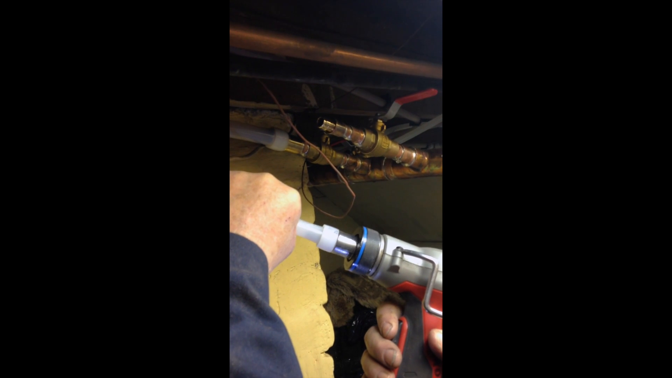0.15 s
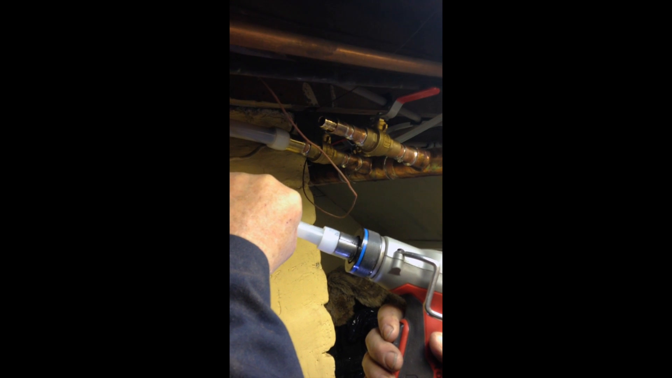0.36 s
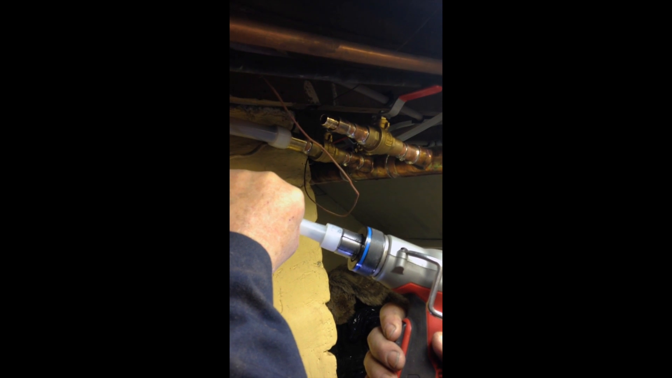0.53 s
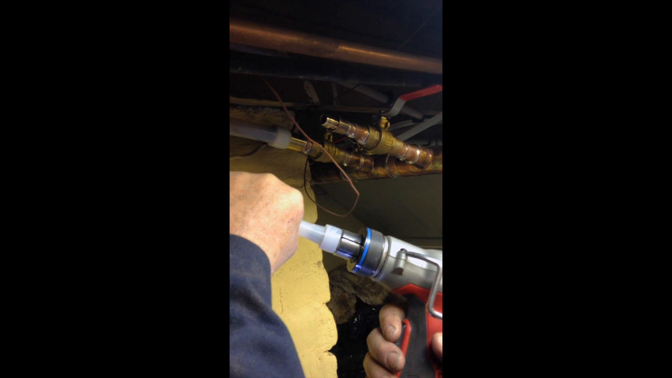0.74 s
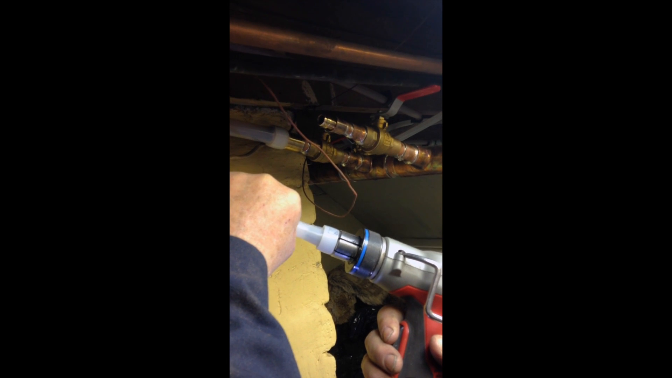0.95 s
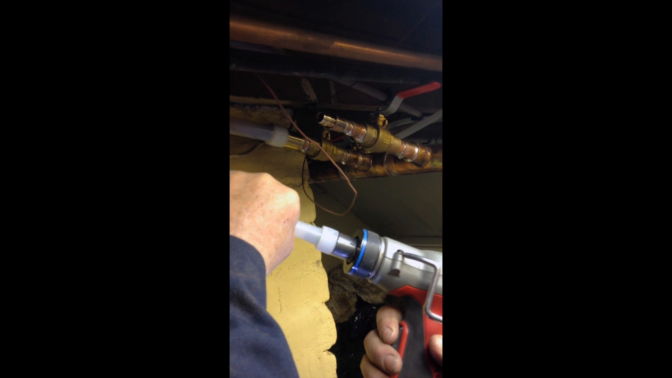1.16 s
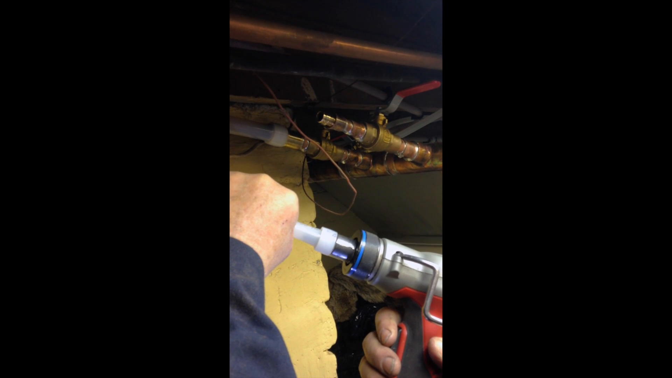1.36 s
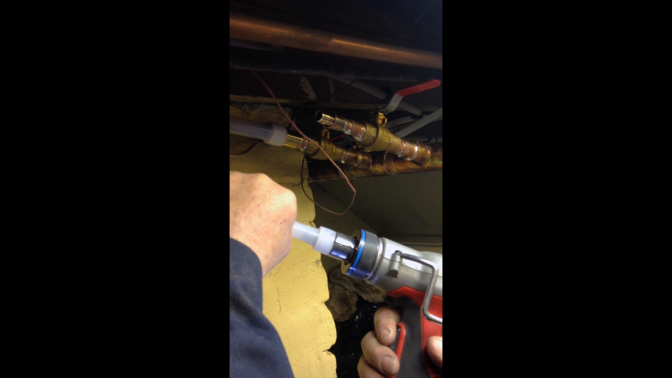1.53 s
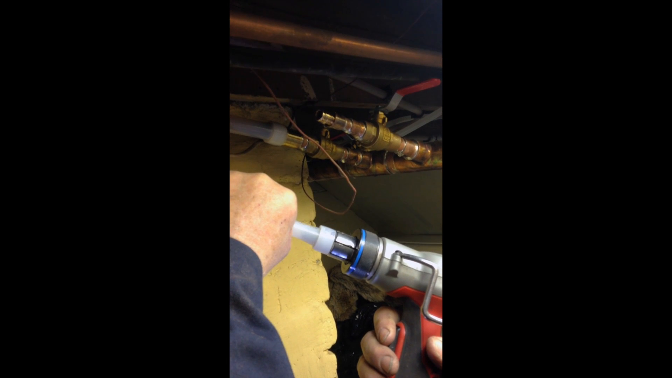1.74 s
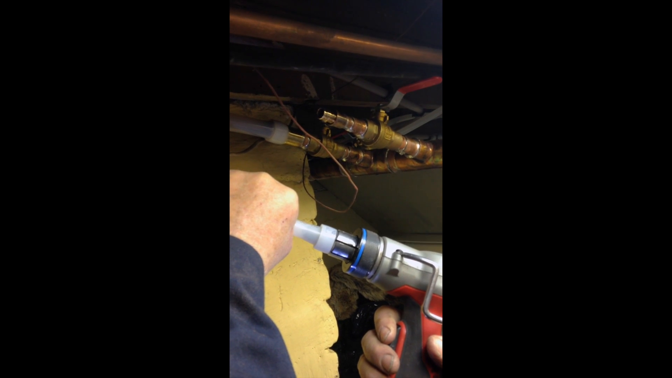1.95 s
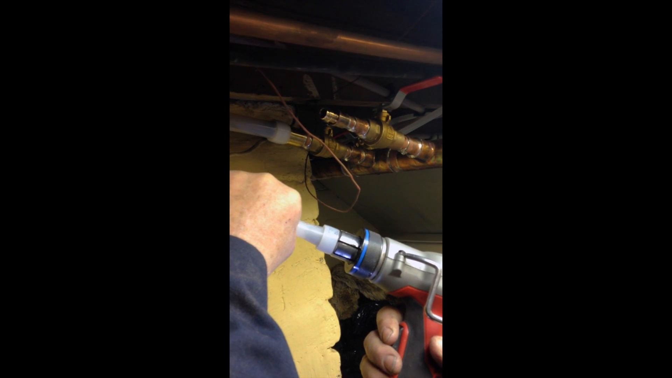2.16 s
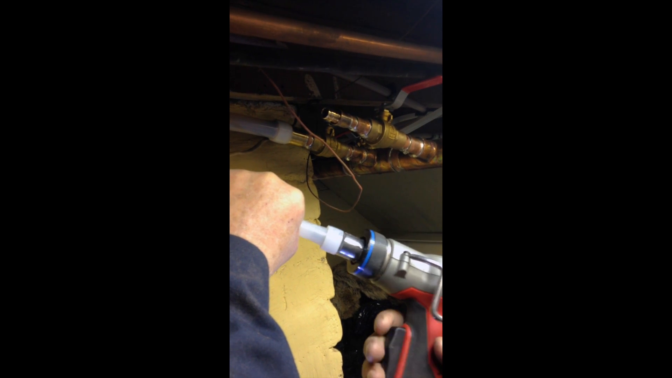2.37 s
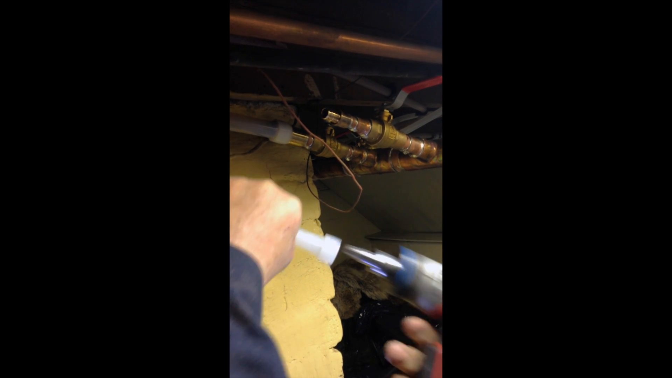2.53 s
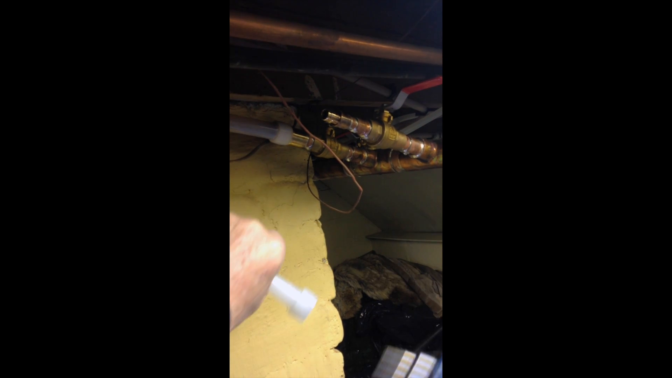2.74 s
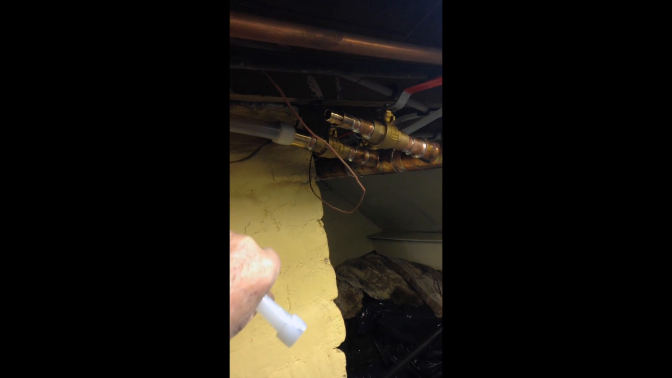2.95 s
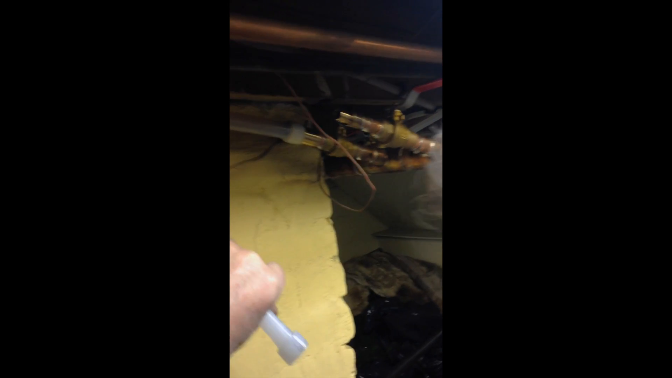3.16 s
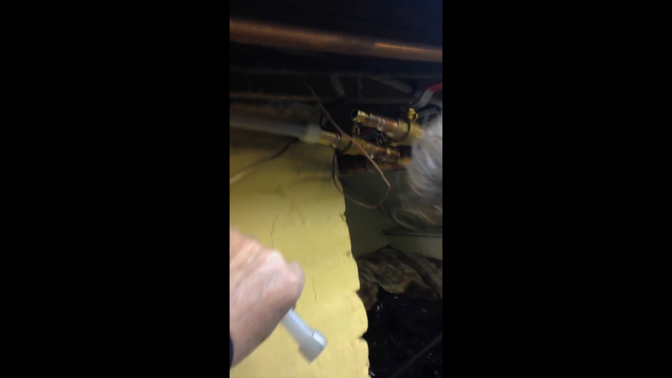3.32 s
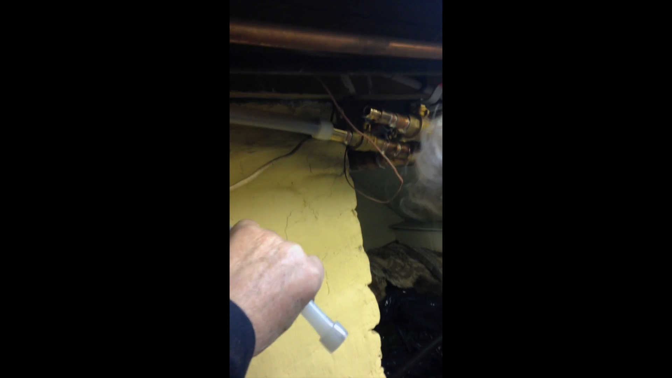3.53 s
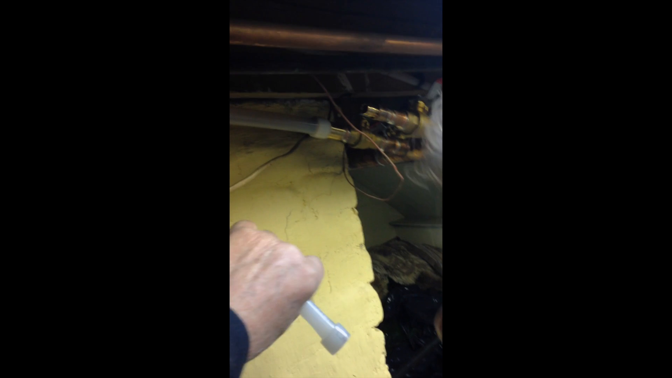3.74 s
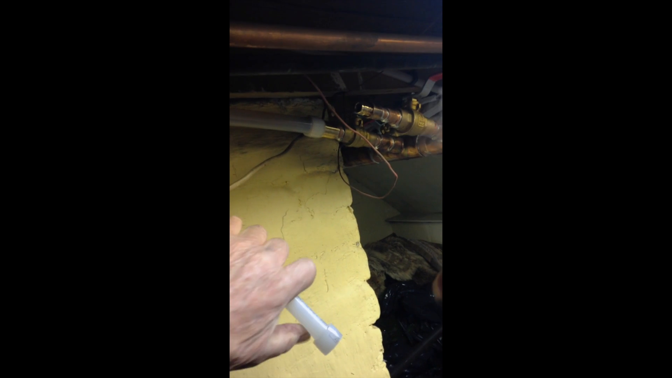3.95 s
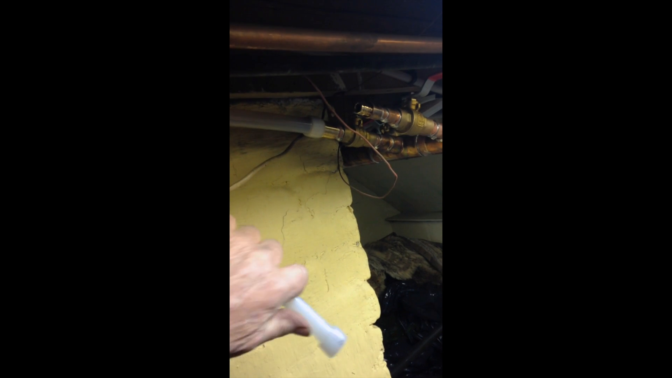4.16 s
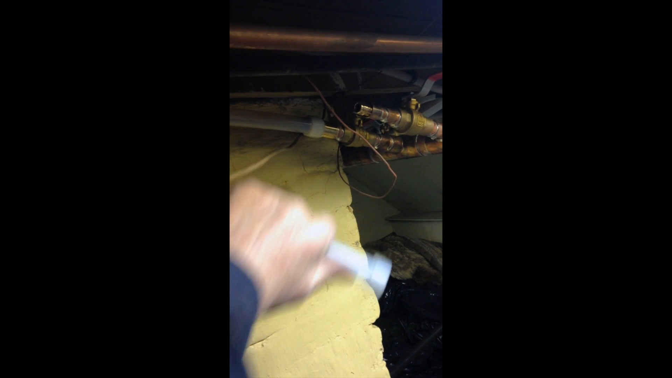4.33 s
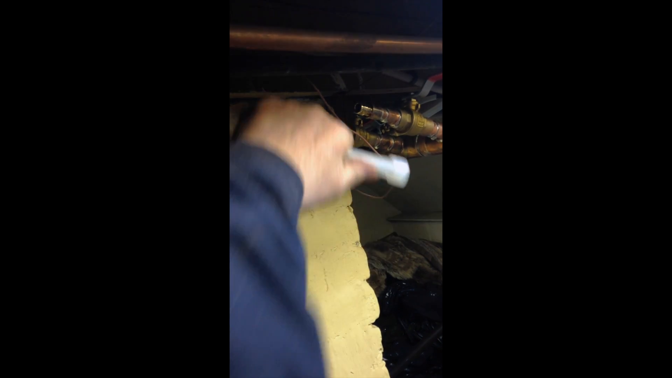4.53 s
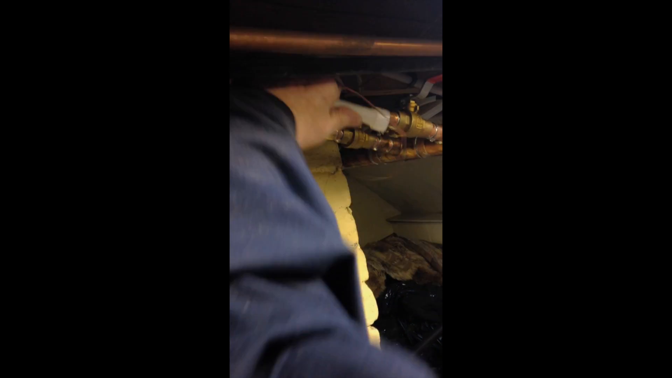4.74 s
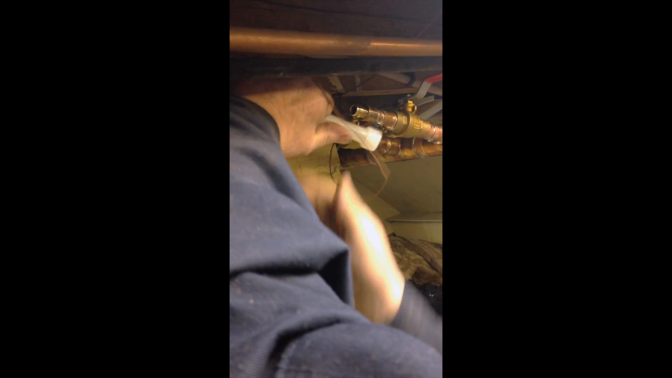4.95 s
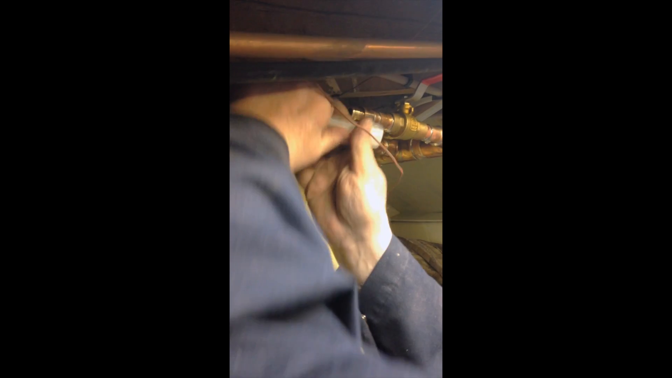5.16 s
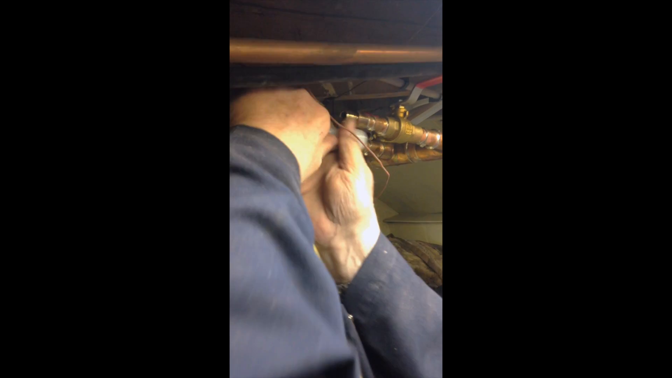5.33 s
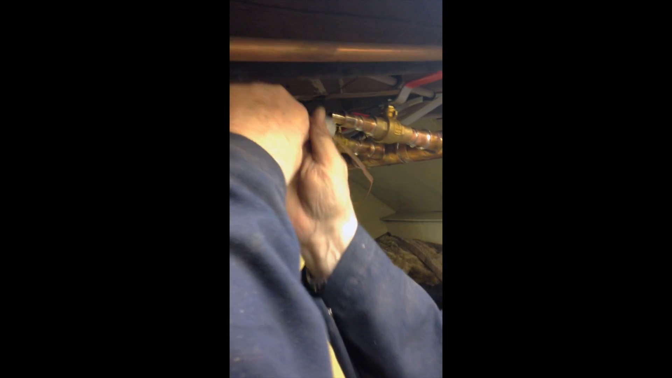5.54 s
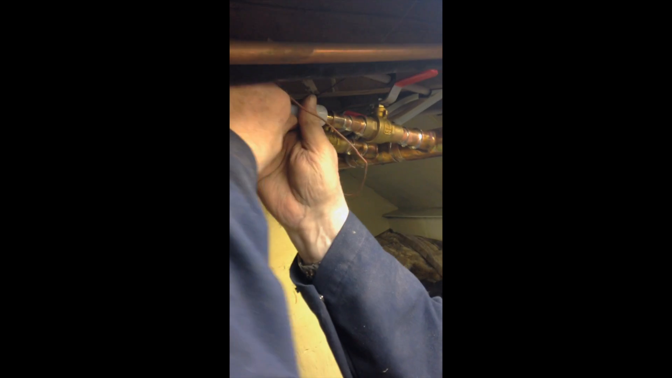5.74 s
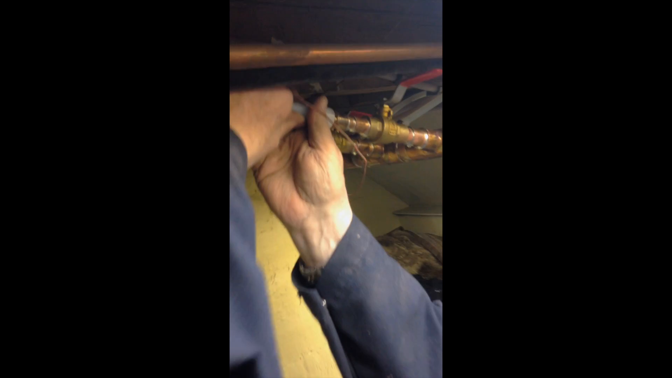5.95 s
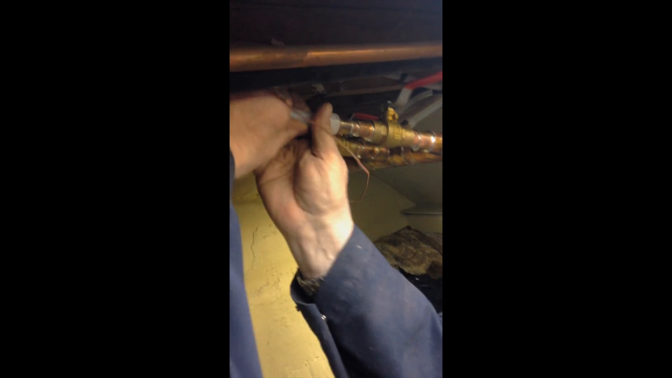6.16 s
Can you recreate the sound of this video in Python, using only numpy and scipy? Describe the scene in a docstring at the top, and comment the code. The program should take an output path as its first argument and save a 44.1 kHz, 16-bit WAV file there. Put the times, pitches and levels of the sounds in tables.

```python
"""A cordless pipe expander runs close by in a low crawl space, over the rumble of the house.
Three times its cam snaps back and rings the steel jaws; between snaps the motor whines free, then
slows and grinds as the cam spreads the jaws. At 2.4 s it brakes with a short groan. Near 3.5 s comes
a low squeak, then the tool is set down with a clatter. To the end, hands and sleeves knock and rub
on pipes, and a faint whistle comes and goes."""
import sys
import numpy as np
from scipy import signal
from scipy.fft import rfft, irfft, next_fast_len
from scipy.io import wavfile
from scipy.ndimage import uniform_filter1d

SR = 44100
rng = np.random.default_rng(int(sys.argv[2]) if len(sys.argv) > 2 else 0)


def wrap_up_sound(samples):
    """Save the sound to the file named by the first command line argument, as 16-bit audio."""
    columns = np.atleast_2d(samples).T
    # keep every value between -1 and 1, then stretch to whole-number steps
    tamed = np.clip(columns, -1, 1)
    steps = np.round(tamed * 32767).astype(np.int16)
    wavfile.write(sys.argv[1], SR, steps)


N = 277389
TIME = np.arange(N) / SR


def undb(db):
    return 10 ** (np.asarray(db) / 20)


def unit(x):
    return x / np.sqrt(np.mean(x ** 2))


def curves(table):
    """Columns of a table joined by straight lines in time."""
    times, *columns = np.transpose(table)
    return [np.interp(TIME, times, column) for column in columns]


def band(x, hz, width_hz):
    """Two-pole resonance, gain 1 at the centre."""
    return signal.lfilter(*signal.iirpeak(min(hz, .45 * SR), hz / width_hz, fs=SR), x)


def steep_band(x, hz, width_hz):
    """The same resonance twice, for steeper skirts."""
    return band(band(x, hz, width_hz), hz, width_hz)


def ring(x, modes):
    """Decaying modes (pitch [Hz], gain [dB], t60 [s]) driven by x."""
    out = 0
    for k, (hz, db, t60) in enumerate(modes):
        pole = np.exp(2j * np.pi * hz / SR - np.log(1000) / (t60 * SR))
        out = out + (-1) ** k * undb(db) * signal.lfilter([1], [1, -pole], x).imag
    return out


def coloured(points):
    """Noise shaped by an EQ curve (frequency [Hz], level [dB]), rms 1."""
    hz, db = np.transpose(points)
    size = next_fast_len(N)
    bins_hz = np.arange(size // 2 + 1) * SR / size
    gain = undb(np.interp(np.log(bins_hz + 1), np.log(hz), db, left=-90, right=-90))
    return unit(irfft(rfft(rng.standard_normal(size)) * gain, size)[:N])


def walk(rate):
    """Smooth random modulation, `rate` new values a second, rms 1."""
    step = int(SR / rate)
    points = rng.standard_normal(N // step + 2)
    return unit(uniform_filter1d(np.interp(np.arange(N) / step, np.arange(len(points)), points), step))


def burst(t60, rise_s):
    """A noise burst with a quick attack and an exponential decay."""
    t = np.arange(int(SR * .4)) / SR
    decay = np.exp(-np.log(1000) * t / max(t60, .004))
    return rng.standard_normal(len(t)) * (1 - np.exp(-t / rise_s)) * decay


def add(out, start_s, x):
    i = int(start_s * SR)
    out[i:i + len(x)] += x[:N - i]


FREE_HZ, LADEN_HZ = 313, 255  # nominal shaft speeds
TRIGGER_OFF_S, BRAKE_S, BRAKE_HZ_PER_S, BRAKE_DB_PER_S = 2.414, .022, 6500, 1000
SPREAD_S, CREST_S, CREST_HZ = .65, .05, 8  # bite to full load; the cam rolling over its top
SPIN_UP_S, OVERSHOOT_HZ, SETTLE_S = .024, 9, .12  # the motor recovering after a snap
# The jaws start to spread the pipe: (time [s])
BITE_TIMES = [-0.62, 0.48, 1.628]
# Level of the tool as heard, ducking after each snap, then swelling back:
# (time after the snap [s], level [dB])
DUCK_AND_SWELL = [(0, -31), (.03, -29), (.12, -31), (.25, -27), (.375, -22.5), (.5, -21), (.8, -22),
                  (1.05, -24.5), (1.11, -24)]


def cam():
    """The cam's load sets shaft speed, grind and gear tone; the level heard dips after each snap."""
    snap_times = np.array([-1.06] + [s for s, _ in CAM_SNAPS] + [np.inf])  # we open mid-turn
    turn = np.searchsorted(snap_times, TIME) - 1
    since_snap = TIME - snap_times[turn]
    since_bite = TIME - np.append(BITE_TIMES, np.inf)[turn]
    since_off = np.maximum(TIME - TRIGGER_OFF_S, 0)
    crest = np.clip(1 - (snap_times[turn + 1] - TIME) / CREST_S, 0, 1)
    strain = 1 - (1 - np.clip(since_bite / SPREAD_S, 0, 1)) ** 2
    sag_hz = (FREE_HZ - LADEN_HZ) * (strain + np.exp(-since_snap / SPIN_UP_S))
    overshoot_hz = OVERSHOOT_HZ * np.exp(-since_snap / SETTLE_S)
    hz = FREE_HZ - 2 - sag_hz + CREST_HZ * crest + overshoot_hz - BRAKE_HZ_PER_S * since_off
    level_db = np.interp(since_snap, *np.transpose(DUCK_AND_SWELL))
    level_db -= BRAKE_DB_PER_S * np.maximum(since_off - BRAKE_S, 0)
    grind_db = -9 + 8.5 * strain ** 1.86 - 1.5 * np.exp(-since_snap / .023)
    grind_db += 11 * np.minimum(since_off / BRAKE_S, 1)  # the grind flares under braking
    mesh_db = -38 + 41 * strain ** .43 - 18 * crest
    return np.maximum(uniform_filter1d(hz, size=400), 150), level_db, grind_db, mesh_db


# Shaft harmonics, running free and under load: (multiple of shaft speed, level [dB])
FREE_HARMONICS = [(1, -15), (2, -21), (3, -14), (4, -16), (5, -8), (6, -15), (7, -12), (8, -15), (9, -14),
                  (10, -13), (11, -16), (12, -16), (13, -19), (14, -22), (15, -20), (16, -21), (17, -19),
                  (18, 0), (19, -22), (20, -28), (21, -19), (22, -21), (23, -15), (24, -15), (25, -20),
                  (26, -13), (27, -16), (28, -15), (29, -21), (30, -22), (31, -21), (32, -21), (33, -16),
                  (34, -19), (35, -21), (36, -11), (37, -14), (38, -8), (39, -12), (40, -16), (41, -19),
                  (42, -23), (43, -20), (44, -17), (45, -16), (46, -20), (47, -19), (48, -21)]
STRAINED_HARMONICS = [(1, -38), (2, -30), (3, -25), (17, -20), (18, -24), (27, -22), (36, -23), (38, -20),
                      (39, -20), (42, -25), (45, -21), (46, -23), (48, -26)]
EASE_S, EASE_DB_PER_S = 2.36, 150  # the finger eases off and the whine fades


def whine(shaft_phase, load):
    """Fluttering shaft harmonics: load damps the rotor's free play and leaves a few strained ones."""
    def stack(harmonics, flutter):
        return np.sqrt(2) * sum(
            undb(db) * flutter[int(k) % 6] * np.sin(k * shaft_phase + rng.uniform(0, 2 * np.pi))
            for k, db in harmonics)

    free_flutter, laden_flutter = ([undb(db * walk(24.89)) for _ in range(6)] for db in (1.5, 5.0))
    softened = [(k, db - 4 * (1 < k < 18)) for k, db in FREE_HARMONICS]  # thins the whine
    free = undb(-3.5 - 26 * load ** .79) * stack(softened, free_flutter)
    strained = np.sqrt(load) * stack(STRAINED_HARMONICS, laden_flutter)
    return (free + strained) * undb(-EASE_DB_PER_S * np.maximum(TIME - EASE_S, 0))


MESH_ORDER, THROB_ORDER = 8.52, .6  # tooth meetings and throbs per shaft turn


def gear_mesh(shaft_phase):
    """The gear tone throbs under the planet carrier's uneven load and smears as teeth meet unevenly."""
    throb = 1 + .55 * np.sin(THROB_ORDER * shaft_phase + 1.5 * walk(40))
    phase = MESH_ORDER * shaft_phase
    return throb * ((1 + .3 * walk(150)) * np.sin(phase) + .4 * walk(220) * np.cos(phase))


# EQ of the brush and fan noise: (frequency [Hz], relative level [dB])
WHIRR_EQ = [(88, -43), (150, -6), (217, -86), (314, -28), (388, -20), (607, -14.5), (1060, -9.5),
            (1600, -12), (5030, -9.5), (5440, -7), (6230, -11), (11600, -10), (15500, -12)]


def whirr(load):
    """Brushes and fan: rough noise, duller and softer when the motor runs free."""
    noise = coloured(WHIRR_EQ) * undb(walk(150))
    treble_cut = 1 - undb(-2 * (1 - load) ** 2)
    return undb(-6 + 4 * load ** .5) * (noise - treble_cut * band(noise, 10500, 9000))


# Midrange housing and treble casing resonances: (centre [Hz], width [Hz], gain [dB])
HOUSING_BANDS = [(850, 210, -15), (1295, 165, -7.5), (1646, 215, -1.5), (2261, 254, -1), (3140, 550, -7)]
CASING_BANDS = [(4600, 500, -8), (7500, 600, -5), (9200, 450, -2), (11600, 700, 2), (13500, 1500, -5)]


def tooth_clatter():
    """Clattering teeth ring the shell; returns the housing's grind and the casing's zing."""
    teeth = rng.standard_normal(N) * undb(1.5 * walk(140))
    return [unit(sum((-1) ** k * undb(db) * band(teeth, hz, width)
                     for k, (hz, width, db) in enumerate(shell)))
            for shell in (HOUSING_BANDS, CASING_BANDS)]


def motor():
    """The motor and gear mix, its tone following the cam's load until the brake stops it."""
    hz, level_db, grind_db, mesh_db = cam()
    load = np.clip((FREE_HZ - hz) / (FREE_HZ - LADEN_HZ), 0, 1) * (TIME < TRIGGER_OFF_S)
    jitter = (.0006 + .003 * load) * walk(60)
    shaft_phase = 2 * np.pi * np.cumsum(hz * (1 + jitter)) / SR
    mix = whine(shaft_phase, load)
    mix += band(undb(mesh_db) * gear_mesh(shaft_phase), 2330, 700)  # coloured by the housing
    mix += whirr(load)
    grind, zing = tooth_clatter()
    mix += undb(grind_db) * grind + .65 * load ** .5 * zing
    slack = np.ones(N)  # the gears go slack and duck the mix as the cam drops off its lobe
    for snap_s, _ in CAM_SNAPS:
        slack[(TIME > snap_s - .0055) & (TIME < snap_s)] = .35
    return undb(level_db) * uniform_filter1d(slack, size=60) * mix + brake_groan(shaft_phase)


# Room tone faders: (time [s], rumble level [dB], air level [dB])
HOUSE_LEVELS = [(0, -44.5, -46), (2.3, -42, -45.5), (2.45, -50, -48.5), (2.6, -40, -52), (3.0, -36, -51.5),
                (3.7, -37, -48), (4.8, -36.5, -49.5), (5.5, -36.5, -49), (6.29, -32, -44.5)]
# EQ of the rumble and of the air: (frequency [Hz], relative level [dB])
RUMBLE_EQ = [(21, -58), (35, -13), (59, -10), (88, -2), (113, 2.5), (157, -6), (179, -16), (217, -26),
             (238, -21.5), (258, -12), (313, -22), (400, -21), (520, -60), (880, -120)]
AIR_EQ = [(120, -46), (200, -15), (258, -25), (479, -13), (783, -16.5), (1260, -21), (1740, -23),
          (2210, -22.5), (3070, -28), (15500, -34)]


def house():
    """The bed: throbbing rumble through the joists and a soft hiss of air."""
    rumble_db, air_db = curves(HOUSE_LEVELS)
    rumble = undb(rumble_db + .98 * walk(8.3)) * coloured(RUMBLE_EQ)
    return rumble + undb(air_db + walk(13)) * coloured(AIR_EQ)


# The cam falls back: (time [s], near-peak level [dB])
CAM_SNAPS = [(.0462, -1), (1.1568, -1), (2.2568, -4)]
# Modes of the steel jaws: (pitch [Hz], gain [dB], t60 [s])
JAW_MODES = [(2380, -32, 0.0027), (3060, -25, 0.0036), (4780, 7.5, 0.0034), (5470, 6.5, 0.0008),
             (8050, -41, 0.0047), (9200, -3, 0.0029), (11500, -3, 0.0028), (12430, -6, 0.011),
             (14700, -7.5, 0.017)]


def snaps():
    """The cam hits its stop: a broad crack and a few ms of ring in the jaws."""
    out = np.zeros(N)
    for start_s, db in CAM_SNAPS:
        rattle = burst(.016, .0003)
        hit = unit(ring(rattle, JAW_MODES)) + unit(band(rattle, 8000, 9000))
        near_peak = np.sort(np.abs(hit))[-6]
        add(out, start_s, undb(db) * hit / near_peak)
    return out


def brake_groan(shaft_phase, length_s=.045):
    """The brake sings on the shaft's third harmonic, diving as the motor stops."""
    progress = np.clip((TIME - TRIGGER_OFF_S) / length_s, 0, 1)
    envelope = 2 * progress ** .3 * (1 - progress) ** 2
    return undb(-28) * envelope * np.sin(3 * shaft_phase)


# Hits of tool, hands and pipes: (time [s], body peak [dB], thud over body [dB],
# crack over body [dB], rattle t60 [s], body centre [Hz])
KNOCK_HITS = [(2.426, -27.5, -35, -20, 0.09, 2320), (2.564, -29, -2, -21, 0.11, 1170),
              (3.74, -15, -7, -4, 0.092, 775), (3.747, -12.5, -15, 4.5, 0.29, 540),
              (3.755, -11.5, -22, 3.5, 0.32, 875), (3.789, -15.5, -2, -6, 0.22, 920),
              (3.808, -17.5, -8, -3, 0.17, 789), (3.863, -27, -26, -1, 0.76, 754),
              (3.883, -27.5, -23, -25, 0.91, 540), (3.97, -22, -15, -24, 0.14, 1480),
              (5.467, -37.5, 9, -18, 0.2, 770), (5.723, -34, 2.5, -16, 0.11, 1360),
              (5.757, -38, 15, -2, 0.11, 540), (5.872, -29, 6.5, -4, 0.22, 503),
              (5.889, -29.5, 2, -2, 0.075, 501), (5.979, -44.5, 17, -18, 0.66, 697),
              (6.225, -33.5, 13, -1, 0.2, 692), (6.258, -42.5, 16, 9, 0.11, 522)]
# Modes of the struck body: (pitch [Hz], gain [dB], t60 [s])
BODY_MODES = [(448, 6, 0.038), (558, 1.5, 0.032), (797, 1, 0.067), (882, 0.5, 0.028), (1232, 6.5, 0.023),
              (1375, 1.5, 0.012), (1736, 5, 0.029), (1970, -6.5, 0.025), (2640, 5, 0.0077),
              (2760, 5.5, 0.0098)]


def knocks():
    """Each knock is a short rattle in three layers: low thud, ringing body and bright crack."""
    out = np.zeros(N)
    for start_s, db, thud_db, crack_db, t60, hz in KNOCK_HITS:
        rattle = burst(t60, .00081)
        thud = band(band(burst(1.54 * t60, .0034), 270, 240), 233, 266)
        body = unit(ring(rattle, BODY_MODES)) + 1.82 * unit(band(rattle, 2400, 1640))
        body = band(body, hz, .47 * hz)
        crack = band(burst(.17 * t60, .0005), 3200, 4700)
        layers = ((0, body), (thud_db, thud), (crack_db, crack))
        add(out, start_s, undb(db) * sum(undb(trim_db) * x / np.abs(x).max() for trim_db, x in layers))
    return out


# Rubs and scrapes: (time [s], length [s], centre [Hz], nominal width [Hz], level [dB])
RUB_STROKES = [(2.53, 0.064, 5950, 1500, -51), (2.532, 0.046, 1160, 1870, -47),
               (3.416, 0.093, 4970, 8000, -50.5), (4.132, 0.088, 2190, 596, -53),
               (4.149, 0.065, 4800, 1500, -58), (4.219, 0.027, 2730, 1500, -55),
               (5.194, 0.08, 11900, 6060, -50), (5.361, 0.1, 4800, 6100, -47.5),
               (4.607, 0.1, 2500, 3070, -52.5), (5.446, 0.078, 11000, 8100, -54),
               (5.698, 0.1, 9000, 8000, -57.5), (6.06, 0.097, 1800, 1230, -38.5),
               (6.091, 0.032, 2300, 510, -38.5), (6.117, 0.033, 1520, 300, -47),
               (6.055, 0.091, 7900, 8800, -50), (6.211, 0.12, 8800, 9000, -48)]


def rubs():
    """Hands and sleeves slide on pipes: grainy friction in a band, swelling and fading."""
    out = np.zeros(N)
    for start_s, length_s, hz, width_hz, db in RUB_STROKES:
        size = int(length_s * SR)
        grains = rng.standard_normal(9000) * undb(3.0 * np.repeat(rng.standard_normal(60), 150))
        friction = unit(steep_band(grains, hz, 1.5 * width_hz))[:size]
        add(out, start_s, undb(db) * friction * signal.windows.tukey(size, .5))
    return out


# Path of the squeak: (time [s], pitch [Hz], level [dB])
SQUEAK_GLIDE = [(3.515, 559, -46), (3.535, 419, -40), (3.555, 437, -31.5), (3.574, 500, -26),
                (3.59, 555, -54)]


def squeak():
    """One short low squeak that dips in pitch, then glides up."""
    hz, db = curves([(3.5, 850, -88.5)] + SQUEAK_GLIDE + [(3.6, 555, -69)])
    phase = 2 * np.pi * np.cumsum(hz) / SR
    return np.sqrt(2) * undb(db) * (np.sin(phase) + .06 * np.sin(2 * phase))


# Small hard contacts: (time [s], peak level [dB], centre [Hz], nominal width [Hz], t60 [s])
TICK_HITS = [(3.721, -31.5, 2600, 1200, 0.047), (3.81, -28, 5500, 600, 0.098),
             (3.929, -27, 7640, 9400, 0.14), (4.093, -55, 3850, 1000, .015),
             (4.3085, -36.5, 2160, 500, .05), (4.7076, -17.5, 6300, 6800, 0.013),
             (4.721, -35.5, 1290, 1510, 0.044), (4.955, -41, 2210, 2500, 0.044),
             (5.278, -38, 2500, 3000, .03), (5.725, -38, 1500, 1490, 0.015),
             (5.198, -38, 13100, 5100, 0.053), (6.096, -30.5, 7850, 8000, 0.038),
             (6.269, -17.5, 11200, 7900, 0.01)]


def ticks():
    """Each contact is a sharp-edged noise burst in one band."""
    out = np.zeros(N)
    for start_s, db, hz, width_hz, t60 in TICK_HITS:
        tick = steep_band(burst(t60, .000053), hz, .84 * width_hz)
        add(out, start_s, undb(db) * tick / np.abs(tick).max())
    return out


# Whistle fader: (time [s], level [dB])
WHISTLE_LEVELS = [(4.93, -80), (4.96, -51.5), (5.04, -60), (5.1, -59), (5.2, -66), (6.05, -71), (6.1, -48),
                  (6.2, -59), (6.29, -68)]


def whistle():
    """A faint, high whistle of narrow noise, wavering in level."""
    db, = curves(WHISTLE_LEVELS)
    tone = unit(steep_band(rng.standard_normal(N), hz=7900, width_hz=200))
    return undb(db + 2.5 * walk(25)) * tone


def scene():
    """Close sounds with a short dense tail from joists and insulation, over the house bed."""
    near = motor() + snaps() + knocks() + ticks() + rubs() + squeak() + whistle()
    tail = burst(t60=.15, rise_s=.0069)
    wet = signal.fftconvolve(near, tail / np.sqrt(np.sum(tail ** 2)))[:N]
    return np.tile(near + undb(-10) * wet + house(), (2, 1))


def record(dry, top_hz=15350):
    """One microphone on both channels; the loudest peaks clip and the top is cut."""
    return signal.sosfilt(signal.ellip(10, .2, 60, top_hz, fs=SR, output="sos"), np.clip(dry, -1, 1))


dry = scene()
out = record(dry)
wrap_up_sound(out)
```